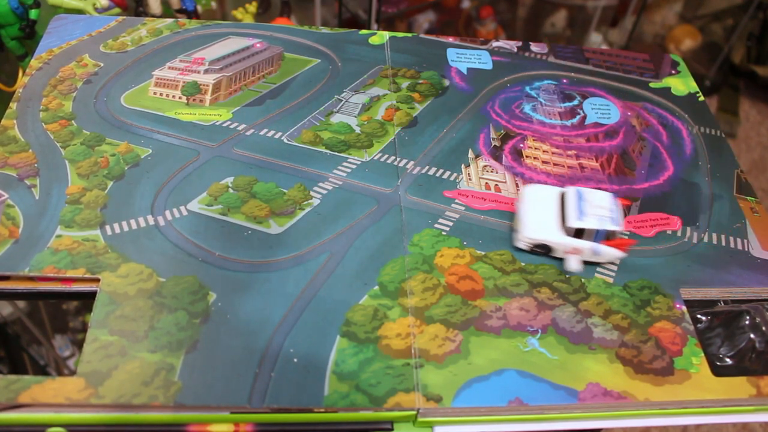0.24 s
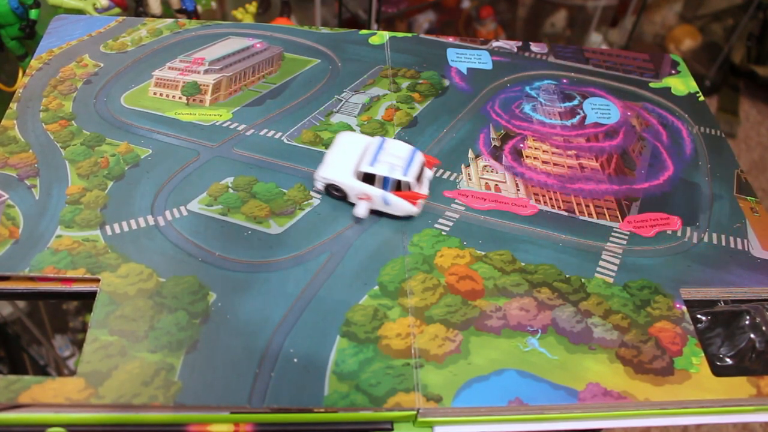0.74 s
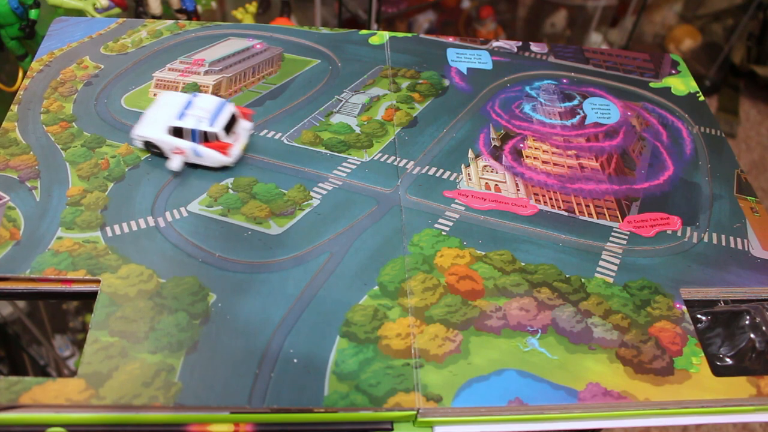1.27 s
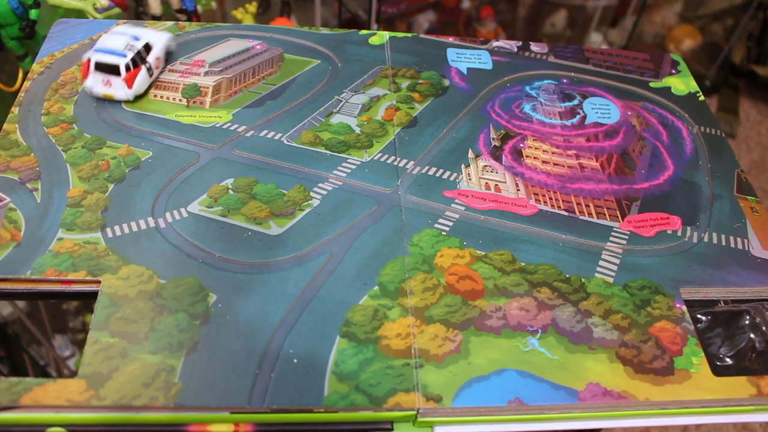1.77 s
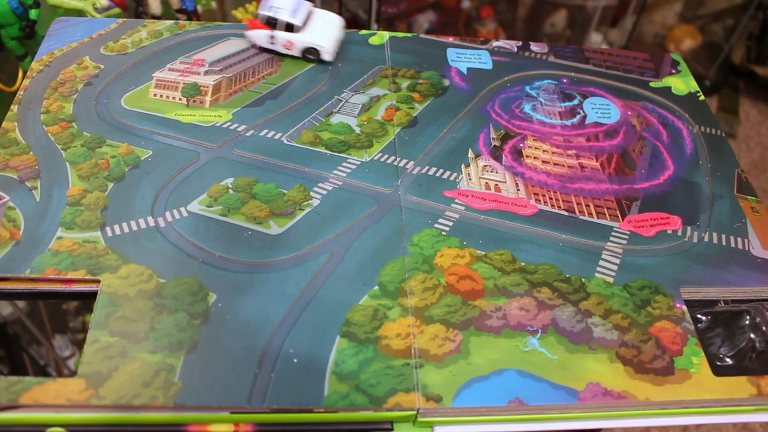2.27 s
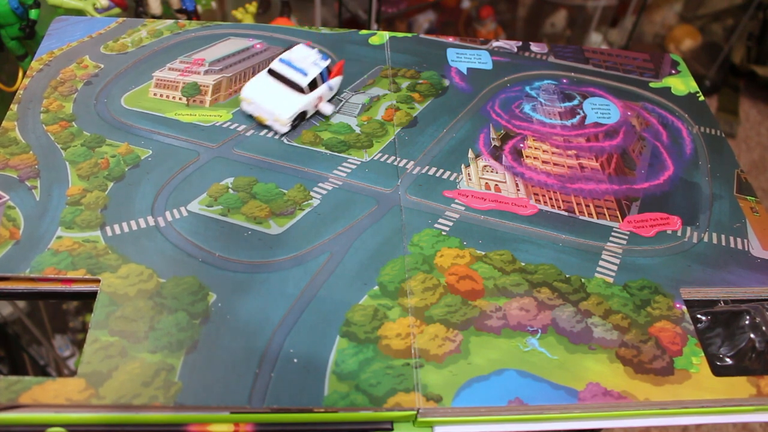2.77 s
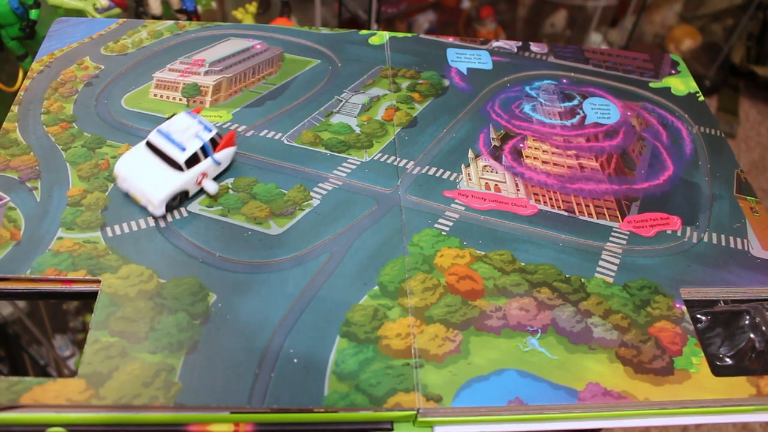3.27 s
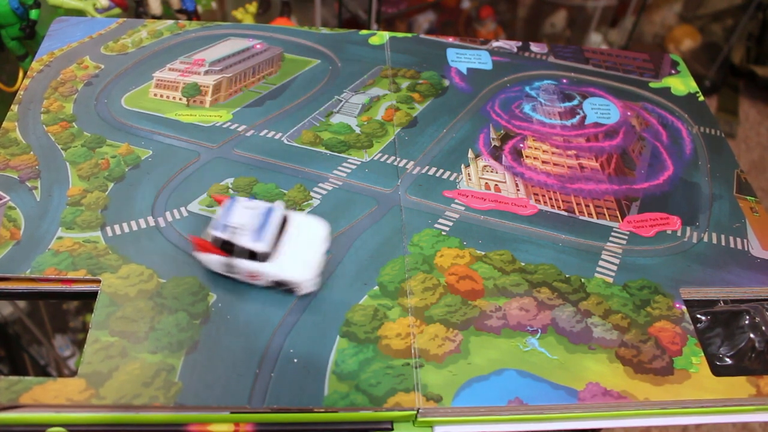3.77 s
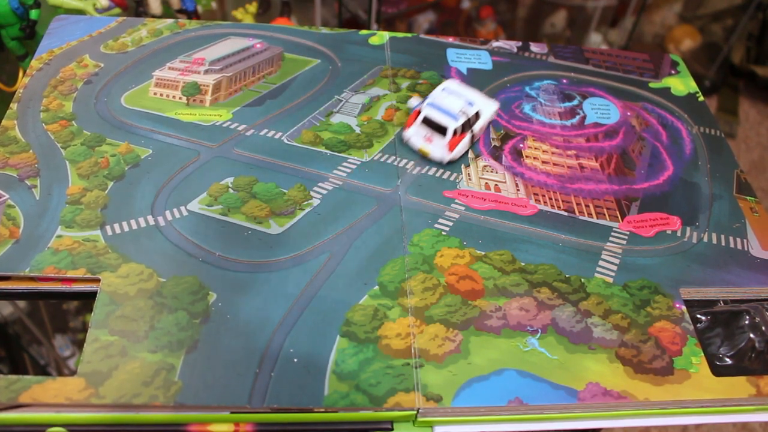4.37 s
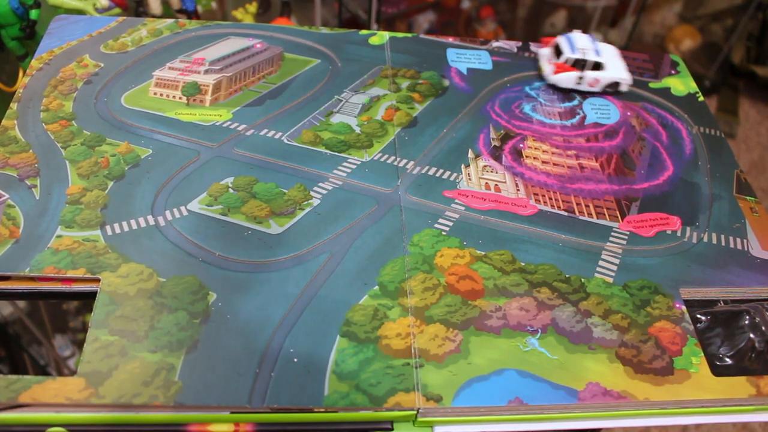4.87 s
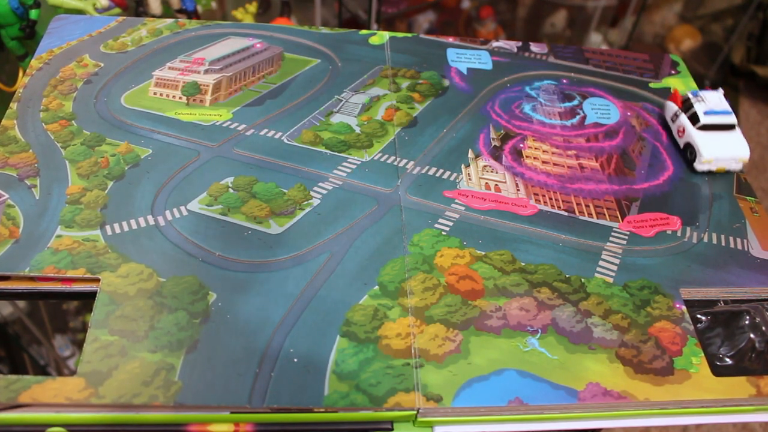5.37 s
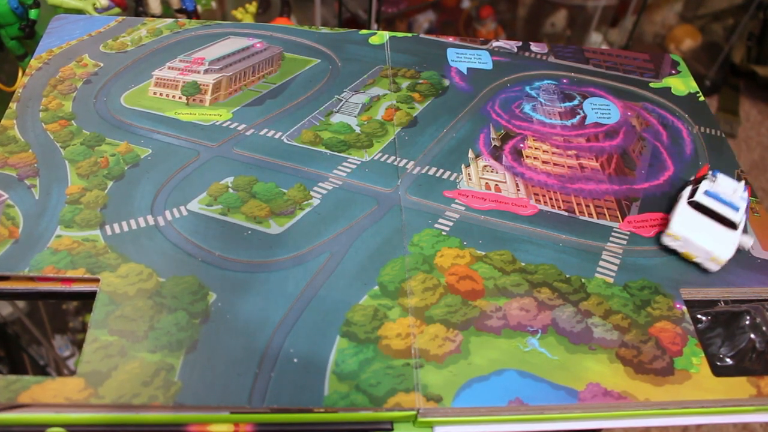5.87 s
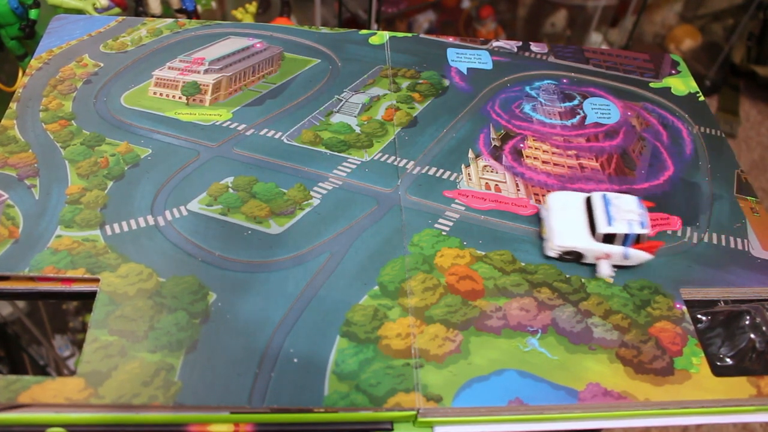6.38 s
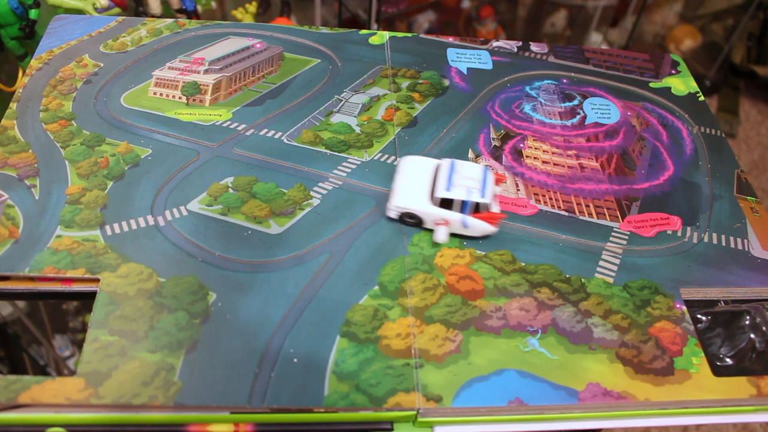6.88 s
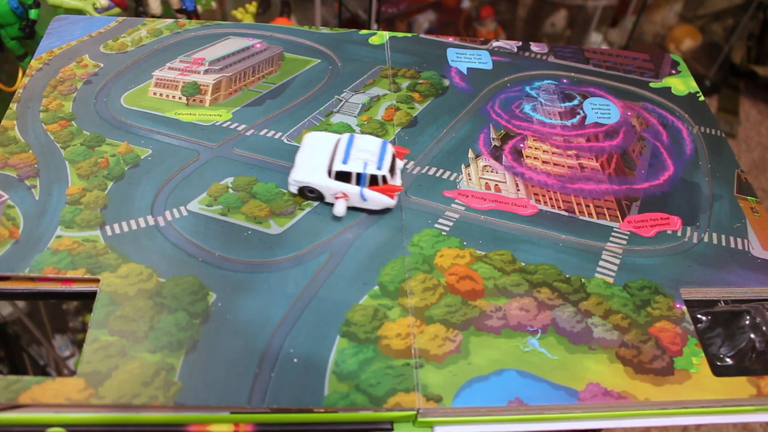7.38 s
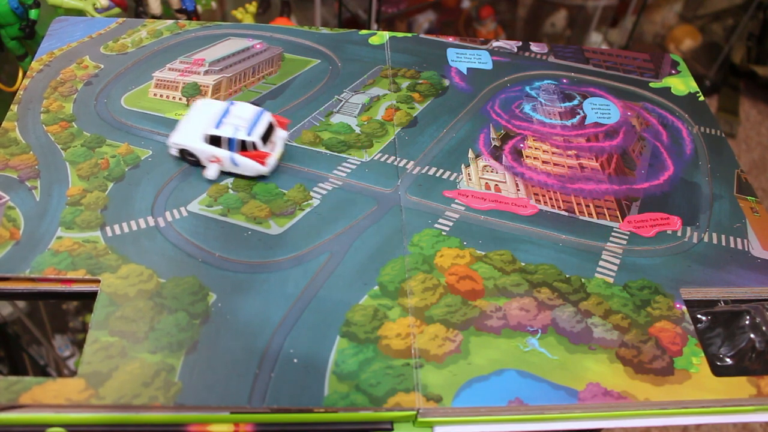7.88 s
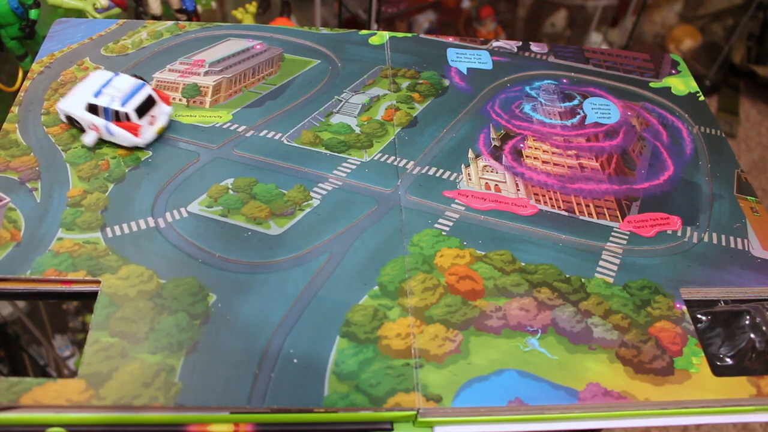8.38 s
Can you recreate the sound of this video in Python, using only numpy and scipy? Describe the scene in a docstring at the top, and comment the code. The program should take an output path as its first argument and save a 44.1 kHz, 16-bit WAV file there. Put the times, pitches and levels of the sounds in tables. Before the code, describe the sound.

Close, continuous clockwork whirring of a plastic toy car, its wheels drumming on a partly hollow board with small bumps and brief stutters.

```python
"""A bright plastic whirr starts at once: a wind-up toy car loops twice around a map on a table, near a microphone.
Impulses of meeting gear teeth, and the sprays of their rebounds, excite a resonant shell and its whining modes.
The wheels rattle, roll and drum on the board, most of all on its hollow half, with bumps and snags of the works.
Near echoes with moving delays comb-filter the whirr; a short room tail, mains hum and low noise lie under it."""
import sys
import numpy as np
from scipy import signal
from scipy.fft import rfft, irfft
from scipy.io import wavfile
from scipy.ndimage import uniform_filter1d, map_coordinates

SR = 44100
rng = np.random.default_rng(int(sys.argv[2]) if len(sys.argv) > 2 else 0)


def to_wav(sig):
    """Store sig (one row per channel, or 1-D mono) as 16-bit WAV at the path in sys.argv[1].

    Samples outside -1..1 are clipped; the rate is SR.
    """
    pcm = np.clip(np.atleast_2d(sig), -1, 1) * 32767
    pcm = np.round(pcm).astype(np.int16)
    wavfile.write(sys.argv[1], SR, pcm.T)  # frames by channels


N = 380583
TIME = np.arange(N) / SR  # s


def amp(db):
    """Logarithmic level: decibels become an amplitude ratio."""
    return 10 ** (np.asarray(db) / 20)


def evened(x):
    """Energy normalisation: the signal is scaled to rms 1."""
    return x / np.sqrt(np.mean(x ** 2) + 1e-20)


def curves(rows):
    """Linear interpolation: each column of a table becomes a curve in time."""
    s, *columns = np.transpose(rows)
    return [np.interp(TIME, s, column) for column in columns]


def wander(rate_hz):
    """Low-pass noise: a random fluctuation of rms 1, mostly slower than the given rate."""
    size = 2 ** 19
    hz = np.fft.rfftfreq(size, 1 / SR)
    spectrum = rfft(rng.standard_normal(size)) / (1 + (hz / rate_hz) ** 2)
    return evened(irfft(spectrum)[:N])


def colour(x, spectrum, peaks=(), size=4096):
    """Minimum-phase filtering: a broad spectrum with peaks and hollows shapes the source causally."""
    hz = np.abs(np.fft.fftfreq(size, 1 / SR))
    f, db = np.transpose(spectrum)
    db = np.interp(np.log(hz + 1), np.log(f), db)
    for centre, width, height in peaks:
        db = db + height / (1 + (2 * (hz - centre) / width) ** 2)
    # the Hilbert transform of the log magnitude gives the minimum phase
    response = np.exp(np.conj(signal.hilbert(np.log(amp(db)))))
    taps = np.fft.ifft(response).real
    return signal.oaconvolve(x, taps[:size // 2])[:len(x)]


def ring(x, modes):
    """Modal resonance: decaying modes are driven; a second, wider pass keeps their skirts dark."""
    out = 0
    for hz, width, db in modes:
        once = signal.lfilter(*signal.iirpeak(hz, hz / width, SR), x)
        twice = signal.lfilter(*signal.iirpeak(hz, hz / (6 * width), SR), once)
        out = out + amp(db) * twice
    return out


def drift(x, depth_db, width_hz, hold_s, size=1024):
    """Spectral modulation: bands swell and fade at random, smoothed over frequency and time."""
    hz, t, z = signal.stft(x, SR, nperseg=size)
    across = max(1, round(width_hz / hz[1]))
    along = max(1, round(hold_s / t[1]))
    field = rng.standard_normal((len(t), len(hz))).T
    for _ in range(2):
        field = uniform_filter1d(uniform_filter1d(field, across, 0), along, 1)
    return signal.istft(z * amp(depth_db * evened(field)), SR, nperseg=size)[1][:N]


# Partials of the mains hum: (frequency [Hz], relative level [dB])
HUM_PARTIALS = [(120, -0.5), (240, -0.5)]
# Swell of the hum, added to each partial's level: (time [s], level [dB])
HUM_SWELL = [(0, -50.5), (1.1, -52), (1.35, -47), (1.85, -53.5), (2.35, -49.5), (3.25, -48.5), (4.2, -53.5),
             (5.55, -46.5), (6.6, -48.5), (7.85, -45.5), (8.1, -50), (8.63, -47.5)]


def mains_hum():
    """Harmonic superposition: steady mains partials share one swelling and fading envelope."""
    hum_db, = curves(HUM_SWELL)
    hum = 0
    for hz, db in HUM_PARTIALS:
        hum = hum + amp(db) * np.sqrt(2) * np.sin(2 * np.pi * (hz * TIME + rng.random()))
    return amp(hum_db) * hum


# Spectrum of the low room noise: (frequency [Hz], relative level [dB])
ROOM_NOISE_SPECTRUM = [(20, -47), (45, -39), (70, 0), (130, -3.5), (260, 5.5), (500, -14.5), (1500, -18),
                       (15000, -44)]


def room_noise():
    """Stationary noise: white noise is coloured towards the bass."""
    return amp(-51.5) * evened(colour(rng.standard_normal(N), ROOM_NOISE_SPECTRUM))


def room(x, t60, size=10000, count=24):
    """Reverberation: sparse, decaying reflections whose pattern crossfades at equal power along the run."""
    t = np.arange(size) / SR
    out = 0
    for spot in range(count + 1):
        nearness = np.sqrt(np.maximum(1 - abs(np.arange(N) * count / N - spot), 0))
        sparse = (rng.random(size) < .1) * (t > .002)
        taps = rng.standard_normal(size) * sparse * amp(-60 * t / t60)
        out = out + signal.oaconvolve(x * nearness, taps / np.linalg.norm(taps))[:N]
    return out


# Near surfaces: (delay for a car at 0, 0 [ms], change to the right [ms/cm], change away [ms/cm],
# signed strength [ratio])
NEAR_SURFACES = [(1.275, .0105, -.028, -.25), (1.44, .0105, -.028, .17), (1.05, .012, -.004, .09),
                 (1.25, .022, -.016, .09), (3, .015, -.035, .09), (1.5, -.013, .03, .08)]


def sliding_echoes(x, right, away):
    """Comb filtering: duller reflections interfere with the direct sound, their delays following the car."""
    dull = signal.sosfiltfilt(signal.butter(1, 12000, fs=SR, output="sos"), x)
    out = x
    for lag_ms, ms_per_cm_right, ms_per_cm_away, strength in NEAR_SURFACES:
        delay_ms = lag_ms + ms_per_cm_right * right + ms_per_cm_away * away
        delay = delay_ms * SR / 1000  # samples
        out = out + strength * map_coordinates(dull, [np.arange(N) - delay], order=3)
    return out


# Two loops around the map, corners rounded later:
# (time [s], right of the microphone [cm], away from it [cm])
ROUTE_POINTS = [(0, 18, 20), (.5, 3.5, 15.6), (1.5, -7.5, 26), (1.75, -15.5, 33), (2, -5, 36),
                (2.25, -3.5, 36.3), (2.5, -3, 30.8), (3.5, -13.5, 18.8), (3.75, -2, 15), (4, -2, 14.7),
                (4.75, 10, 29.9), (5.25, 15, 26), (5.8, 20, 19.2), (6.25, 19.5, 20.3), (7, 0.2, 16.3),
                (7.5, -0.5, 18.3), (8.25, -11.5, 26.1), (8.63, -18, 27.4)]
STEER_S = 0.36  # time over which the car rounds a corner
BEAM_RAD = 0.58  # angle from the nose to the front corner


def travel():
    """Source directivity: position [cm] and how squarely the front corner faces the microphone (-1 to 1)."""
    steer = round(STEER_S * SR)
    right, away = (uniform_filter1d(c, steer, mode="nearest") for c in curves(ROUTE_POINTS))
    place = right + 1j * away
    heading = np.angle(np.gradient(place))
    to_microphone = np.angle(-place)
    return right, away, np.cos(heading - to_microphone + BEAM_RAD)


# The works catch or lurch free: (time [s], half length to 1/e of the dB change [s], change [dB])
SNAG_EVENTS = [(.675, .012, 3), (0.78, 0.0045, 5), (0.832, 0.0035, -10), (0.863, 0.0032, -12),
               (.913, 0.02, -5), (2.297, 0.0051, 1), (2.415, 0.011, 2.5), (2.486, 0.031, -3),
               (2.771, 0.011, -2), (2.868, 0.013, -2), (3.373, 0.038, -2.5), (4.06, 0.0076, -4.5),
               (5.33, 0.072, -2.5), (5.717, 0.016, -4), (7.063, 0.028, -3), (7.164, 0.013, -7),
               (7.188, .0036, 6), (7.197, 0.0085, -12), (7.244, 0.0048, 6.5), (7.294, 0.011, -8),
               (7.34, 0.0088, 0.5), (7.37, .006, -7), (7.386, .006, 4), (7.429, .007, 6),
               (7.465, 0.05, -8.5), (7.555, 0.0044, 4), (8.223, 0.052, -4)]


def snags():
    """Amplitude modulation: brief Gaussian dips and surges of the car's level [dB]."""
    return sum(db * np.exp(-((TIME - s) / half) ** 2) for s, half, db in SNAG_EVENTS)


# Wheels bump on the board: (time [s], relative knock peak [dB], relative thud-to-knock level [dB])
BUMP_EVENTS = [(0.779, -16, -34), (0.843, -8.5, -27), (.871, -14, -37), (1.304, -11, -29),
               (1.337, -18, -18.5), (1.396, -8.5, -33), (1.58, -14, -38), (2.411, -21, -38),
               (3.215, -14, -25), (3.265, -13, -25), (3.33, -8.5, -35), (4.036, -10, -35),
               (4.068, -10, -39), (4.106, -11.5, -39), (4.18, -15.5, -28), (4.221, -14.5, -25),
               (4.281, -13, -34.5), (7.385, -25, -15), (8.029, -11.5, -24), (8.06, -18, -14),
               (8.144, -14, -22)]
# Spectrum of the table's thud: (frequency [Hz], relative level [dB])
THUD_SPECTRUM = [(30, -31), (90, -8), (150, -6), (300, -4.5), (600, -15.5), (1500, -32), (15000, -70)]
# Spectrum of knocks and of wheel rattle: (frequency [Hz], relative level [dB])
RATTLE_SPECTRUM = [(100, -30), (750, -36), (950, -14.5), (1250, 3), (1550, 4), (1800, -5), (2800, -11),
                   (5000, -18.5), (15000, -64)]
# Modes of the board, for knocks and drumming: (frequency [Hz], width [Hz], relative level [dB])
BOARD_MODES = [(1111.3, 42.4, 1), (1146, 154, -10.5), (987, 74, -18), (745, 62, -15.5)]


def bumps(size=4096):
    """Impact excitation: each blow with a short rattle makes the board knock and the table thud."""
    out = np.zeros(N + 2 * size)
    t = np.arange(size) / SR
    for s, db, thud_db in BUMP_EVENTS:
        blow = rng.standard_normal(size) * np.exp(-t / 0.0076)
        blow[0] += 8  # the first contact
        knock = colour(blow, RATTLE_SPECTRUM) + amp(14) * ring(blow, BOARD_MODES)
        knock = knock / abs(knock).max()
        thud = colour(rng.standard_normal(size) * np.exp(-t / 0.014), THUD_SPECTRUM)
        thud = thud / abs(thud).max()
        out[round(s * SR):][:size] += amp(db - 0.5) * (knock + amp(thud_db + 8) * thud)
    return out[:N]


def tooth_clicks(rate_hz, jitter, spread_db):
    """Impulse train: one click of uneven size for each tooth that meets the next."""
    turns = np.cumsum(rate_hz * np.exp(jitter * wander(150))) / SR
    hits = np.diff(np.floor(turns), prepend=0)
    return evened(hits * amp(spread_db * (2 * rng.random(N) - 1)))


# the gears slow as the spring unwinds; the governor's teeth meet faster than the drive gear's
DRIVE_HZ, SAG_HZ_PER_S, GOVERNOR_RATIO = 394.9, 6, 1.54


def chatter(rebound_db, settle_s, flutter_db):
    """Repeated impact: two gears click, and loose teeth rebound in a spray that surges after each click."""
    drive_hz = DRIVE_HZ - SAG_HZ_PER_S * TIME
    drive = tooth_clicks(drive_hz, jitter=.14, spread_db=6.5)
    governor = tooth_clicks(GOVERNOR_RATIO * drive_hz, jitter=.14, spread_db=2.5)
    clicks = drive + amp(5.5) * governor
    looseness = evened(signal.lfilter([1], [1, -np.exp(-1 / (settle_s * SR))], clicks))
    spray = (looseness + .5) * (2 * rng.random(N) - 1)
    mixed = evened(clicks - clicks.mean()) + amp(rebound_db) * evened(spray)
    return evened(mixed * amp(flutter_db * wander(40)))


# Spectrum of the rolling rumble: (frequency [Hz], relative level [dB])
ROLLING_SPECTRUM = [(40, -15), (70, -11), (130, -2.5), (300, -2.5), (450, 2.5), (580, -6.5), (750, -4),
                    (950, 0), (1400, -12.5), (15000, -57)]
# the left half of the board lies hollow, most of all around its middle
FOLD_CM, FOLD_WIDTH_CM, HOLLOW_RIGHT_CM, HOLLOW_AWAY_CM, HOLLOW_REACH_CM = 4.3, 2.1, -9.5, 20.9, 19.2
# level on the firm half (dB), gain over a full hollow (dB); the drumming grows along the run
DRUM_DB, DRUM_HOLLOW_DB, DRUM_RISE_DB_PER_S = -48, 22.5, 0.34
ROLL_DB, ROLL_HOLLOW_DB, ROLL_DB_PER_CM_AWAY = -47, 6.5, -0.12
# the rattle grows towards the far left corner
RATTLE_DB, RATTLE_DB_PER_CM_RIGHT, RATTLE_DB_PER_CM_AWAY = -32.5, -0.19, 0.37


def wheels(right, away):
    """Structure-borne sound: wheels rattle and shake the board, which drums and rumbles where it is hollow."""
    off_middle = np.hypot(right - HOLLOW_RIGHT_CM, away - HOLLOW_AWAY_CM)
    left_of_fold = 1 / (1 + np.exp((right - FOLD_CM) / FOLD_WIDTH_CM))
    hollow = np.exp(-(off_middle / HOLLOW_REACH_CM) ** 2) * left_of_fold
    beyond = away - HOLLOW_AWAY_CM
    drum_db = DRUM_DB + DRUM_HOLLOW_DB * hollow + DRUM_RISE_DB_PER_S * TIME
    roll_db = ROLL_DB + ROLL_HOLLOW_DB * hollow + ROLL_DB_PER_CM_AWAY * beyond
    rattle_db = RATTLE_DB + RATTLE_DB_PER_CM_RIGHT * right + RATTLE_DB_PER_CM_AWAY * beyond
    drum = ring(chatter(rebound_db=5.5, settle_s=0.0025, flutter_db=2.5), BOARD_MODES)
    rattle = colour(chatter(rebound_db=13.5, settle_s=0.0086, flutter_db=2.0), RATTLE_SPECTRUM)
    rattle = drift(rattle, depth_db=1.66, width_hz=130, hold_s=1.0)
    roll = colour(chatter(rebound_db=3.5, settle_s=0.0061, flutter_db=1.5), ROLLING_SPECTRUM)
    roll = drift(roll, depth_db=2.0, width_hz=45, hold_s=.18, size=2048)
    return amp(drum_db) * evened(drum) + amp(rattle_db) * evened(rattle) + amp(roll_db) * evened(roll)


# Gear sound along the run: (time [s], relative rasp level [dB], relative tooth fizz level [dB])
GEAR_LEVELS = [(0, -18.5, -22.5), (.3, -19, -22.5), (1, -19.5, -22.5), (1.65, -20, -19.5),
               (1.95, -21, -22.5), (2.38, -20.5, -20.5), (2.6, -21, -22), (3.7, -18.5, -23),
               (4.6, -20, -20), (4.85, -21.5, -21.5), (5.2, -19, -21.5), (6.35, -18, -23), (6.85, -18, -20),
               (7.3, -21, -24.5), (7.9, -19, -20), (8.63, -22, -21.5)]
# Relative level of the whine: (time [s], level [dB])
WHINE_SWELL = [(0, -29), (.3, -23), (.72, -24), (1.4, -26.5), (1.6, -26.5), (2, -28.5), (2.33, -23.5),
               (2.9, -24), (3.55, -25.5), (4.1, -23.5), (4.7, -34), (5, -31), (5.7, -21.5), (6.05, -26),
               (6.85, -22.5), (7.65, -25), (8.15, -25), (8.63, -27.5)]
# Broad spectrum of the gears: (frequency [Hz], relative level [dB])
GEAR_SPECTRUM = [(100, -35), (600, -30), (900, -13.5), (1400, -17.5), (1750, -5), (2500, -10.5),
                 (3500, -4.5), (4300, 0), (6000, 1), (8500, -4.5), (10000, -3.5), (12000, -3), (14000, -6),
                 (15700, -13)]
# Peaks and hollows of the plastic shell: (frequency [Hz], width [Hz], height [dB])
SHELL_PEAKS = [(2660, 220, 8), (3160, 315, 8), (3390, 230, -4.5), (3640, 190, 4), (4770, 340, 0),
               (5370, 900, 2.5), (6370, 170, -2), (6640, 320, 6.5), (6900, 200, -0.5), (7420, 220, 6.5),
               (12200, 300, 5), (12530, 300, -8), (13100, 330, 4)]
# Whining modes of the shell: (frequency [Hz], width [Hz], relative level [dB])
WHINE_MODES = [(2176, 62, 0), (2110, 70, -7), (1980, 100, -7)]
# Beamed mode, louder when the front corner faces the microphone:
# (frequency [Hz], width [Hz], relative level [dB])
FLANK_MODE = [(4497, 143, 0)]
# Beamed mode, softer when that corner faces the microphone:
# (frequency [Hz], width [Hz], relative level [dB])
TAIL_MODE = [(6020, 310, 0)]
# relative level side-on to the beam (dB), gain when the corner faces the microphone (dB)
FLANK_DB, FLANK_NOSE_DB = -30, 5
TAIL_DB, TAIL_NOSE_DB = -32, -7.5
# the flank's beam fades beyond the near side of the table
NEAR_CM, FLANK_DB_PER_CM_AWAY = 16.3, -0.4358


def clockwork(nose, away):
    """Source and resonator: gear chatter sounds through the shell and keeps its strongest modes whining."""
    rasp_db, fizz_db = curves(GEAR_LEVELS)
    whine_db, = curves(WHINE_SWELL)
    flank_db = FLANK_DB + FLANK_NOSE_DB * nose + FLANK_DB_PER_CM_AWAY * (away - NEAR_CM)
    tail_db = TAIL_DB + TAIL_NOSE_DB * nose
    teeth = chatter(rebound_db=11, settle_s=0.00089, flutter_db=1.05)
    teeth = colour(teeth, GEAR_SPECTRUM, SHELL_PEAKS)
    teeth = drift(teeth, depth_db=1.3, width_hz=300, hold_s=.25)
    rasp = signal.sosfiltfilt(signal.butter(4, 8200, fs=SR, output="sos"), teeth)
    fizz = teeth - rasp  # the top is beamed more narrowly, so it has its own level
    gears = amp(rasp_db - 1.77) * evened(rasp) + amp(fizz_db + 0.6) * evened(fizz)
    buzz = chatter(rebound_db=7, settle_s=0.0026, flutter_db=1.56)
    flank = amp(flank_db) * evened(ring(buzz, FLANK_MODE))
    tail = amp(tail_db) * evened(ring(buzz, TAIL_MODE))
    whine = amp(whine_db - 2.0) * evened(ring(buzz, WHINE_MODES))
    return gears + flank + tail + whine


def scene():
    """Superposition: the car, its echoes, the room and the background, alike in both channels."""
    right, away, nose = travel()
    works = amp(-0.72) * sliding_echoes(clockwork(nose, away), right, away)
    car = amp(snags()) * (works + wheels(right, away)) + bumps()
    heard = car + amp(-12.0) * room(car, t60=0.14) + mains_hum() + room_noise()
    return np.tile(heard, (2, 1))


def record(dry):
    """Saturation and band limiting: the highest peaks are rounded off and the top treble is cut."""
    rounded = dry / (1 + (dry / .75) ** 6) ** (1 / 6)
    lowpass = signal.firwin(1023, 15780, window=("kaiser", 9), fs=SR)  # cutoff in Hz
    return signal.oaconvolve(rounded, lowpass[None], "same")


dry = scene()
out = record(dry)
to_wav(out)
```